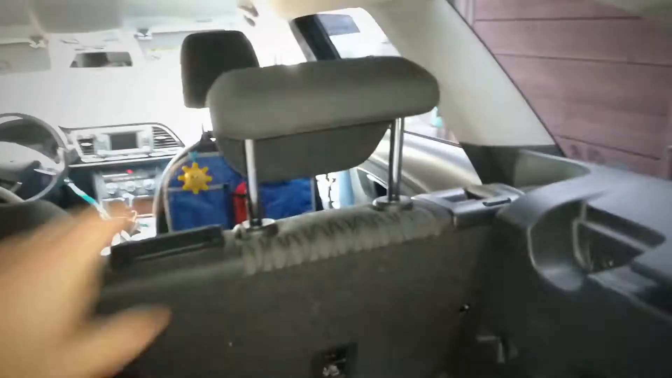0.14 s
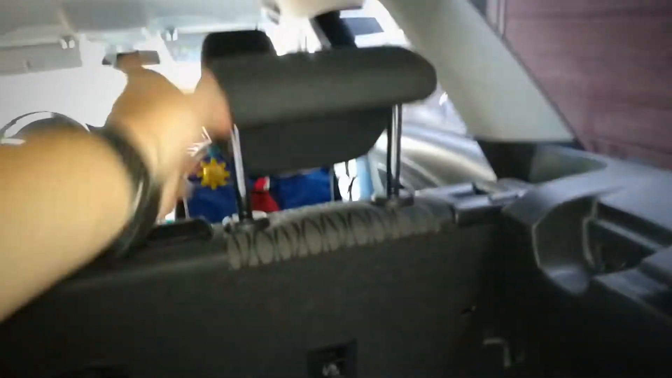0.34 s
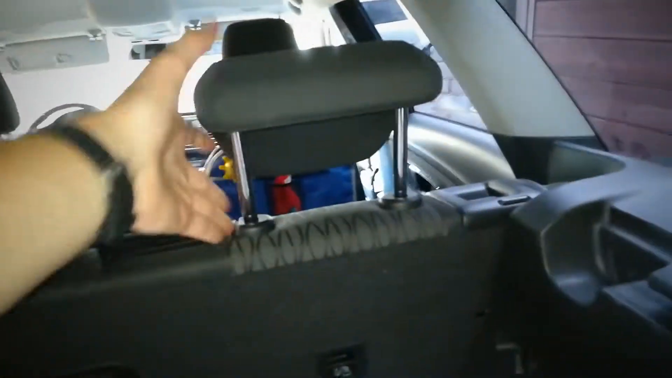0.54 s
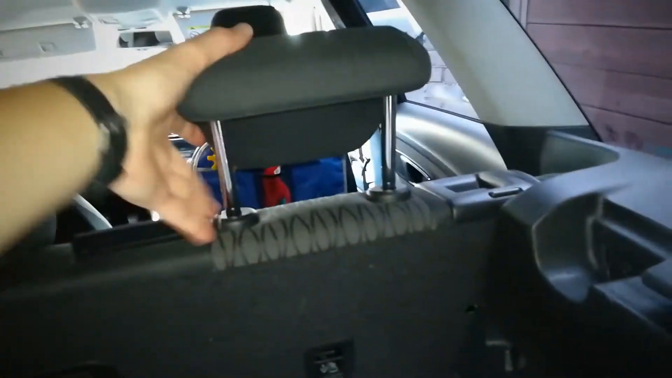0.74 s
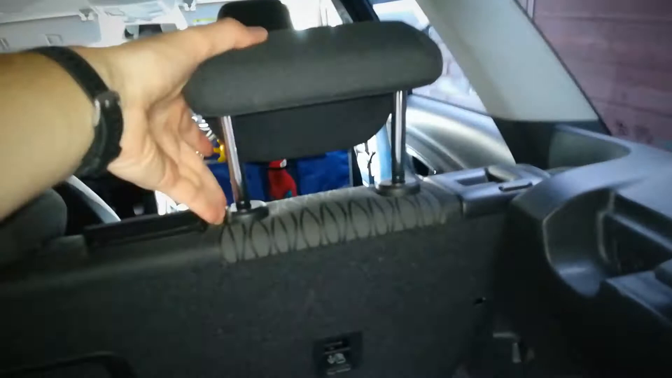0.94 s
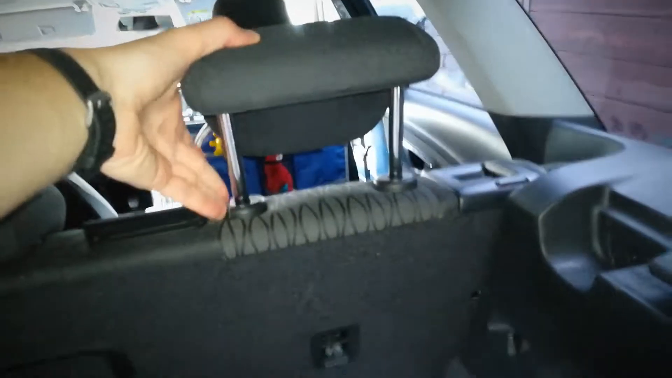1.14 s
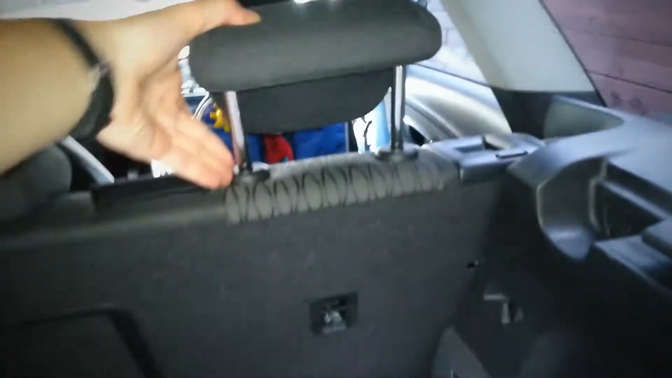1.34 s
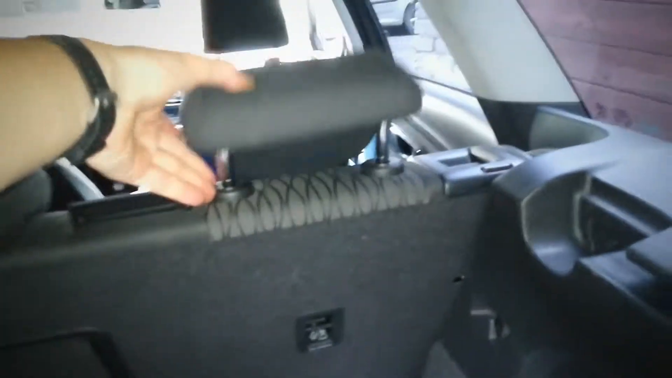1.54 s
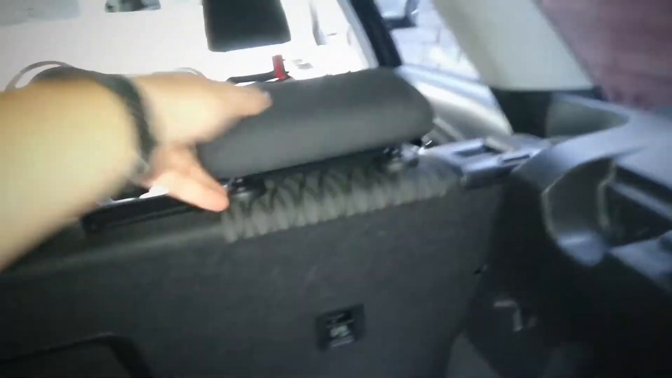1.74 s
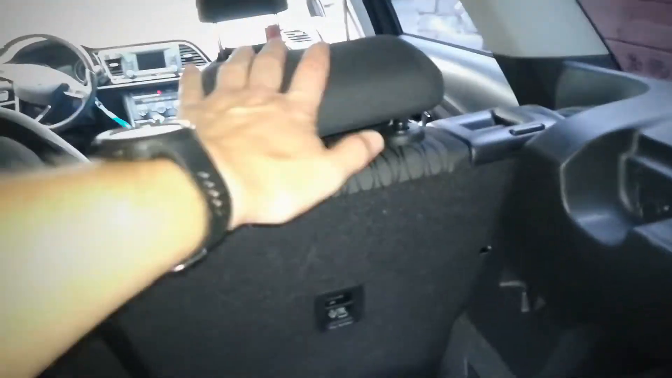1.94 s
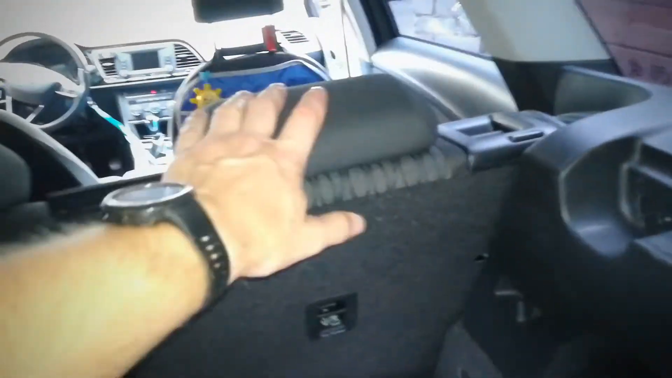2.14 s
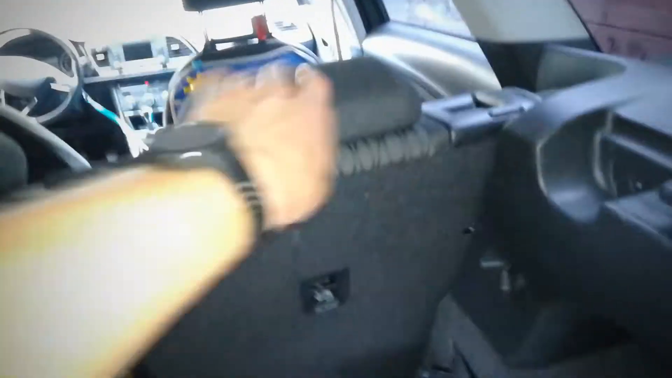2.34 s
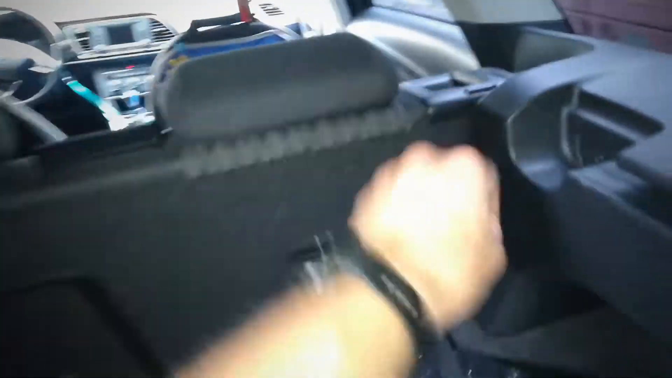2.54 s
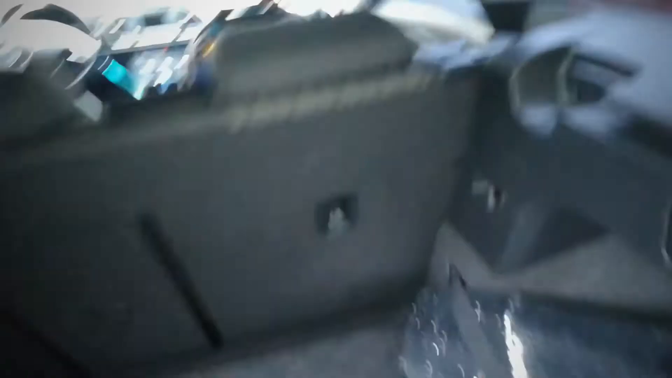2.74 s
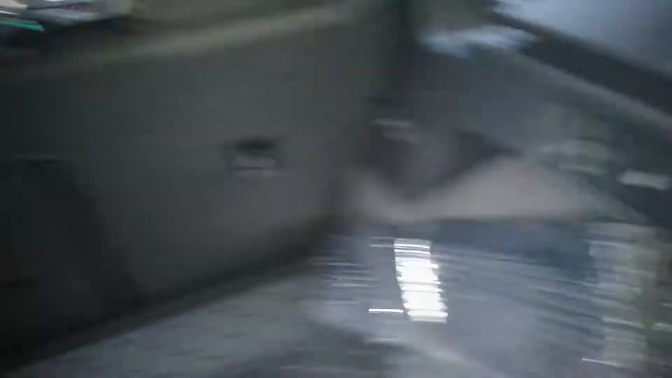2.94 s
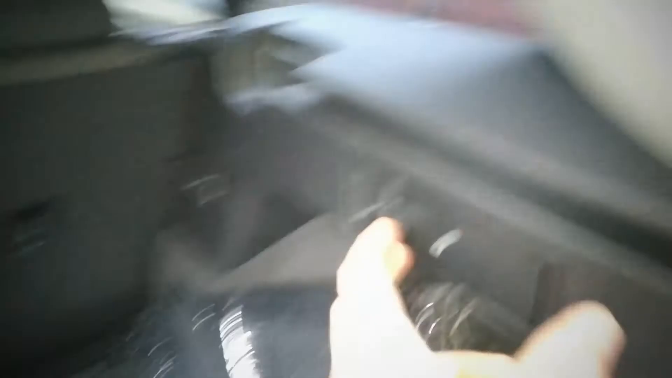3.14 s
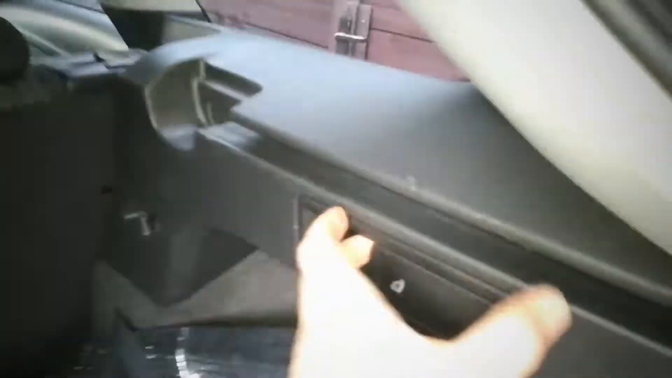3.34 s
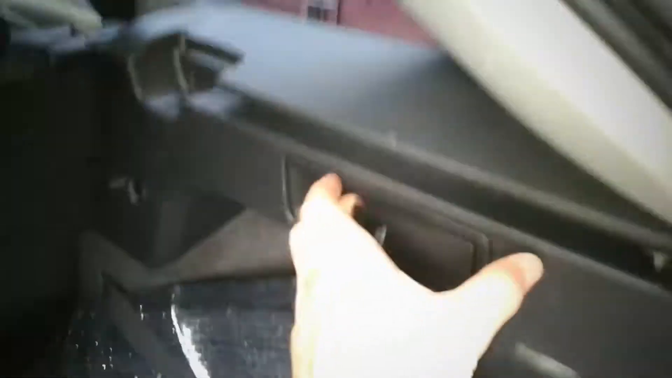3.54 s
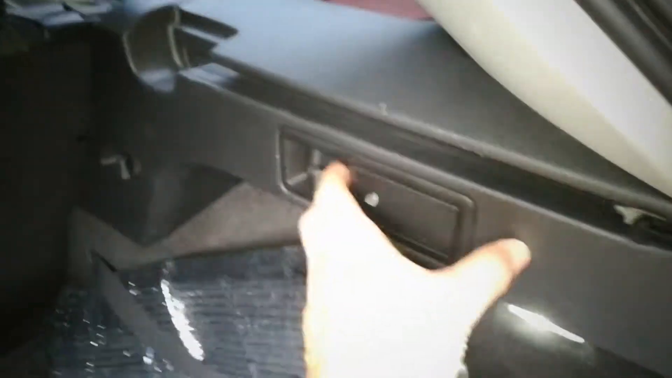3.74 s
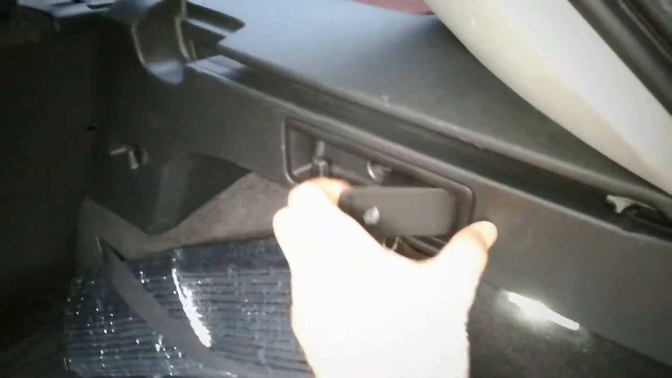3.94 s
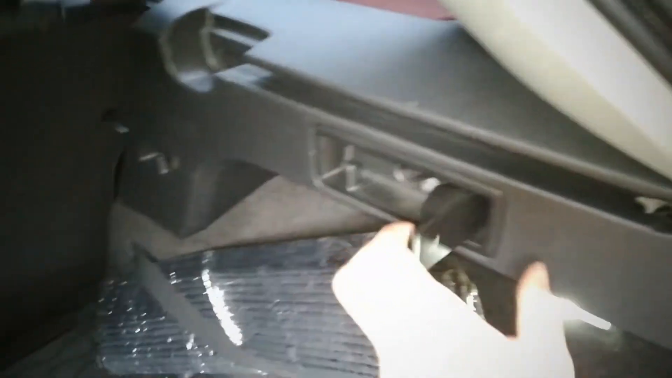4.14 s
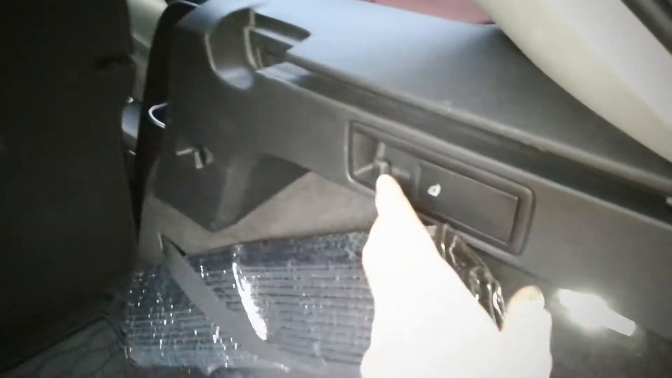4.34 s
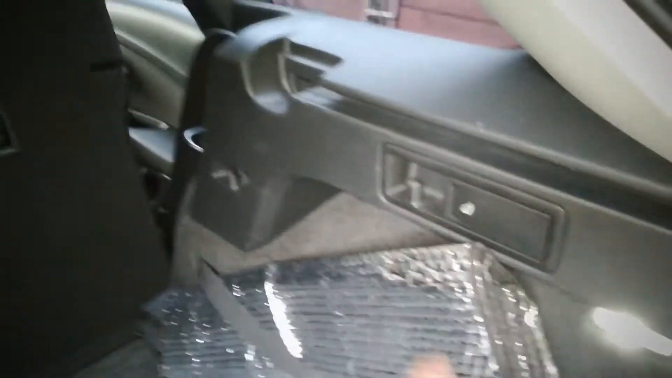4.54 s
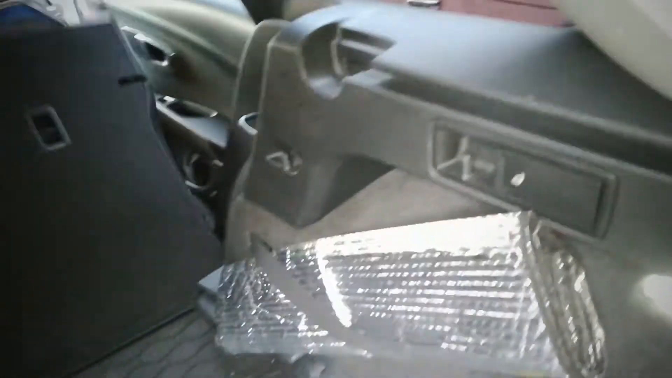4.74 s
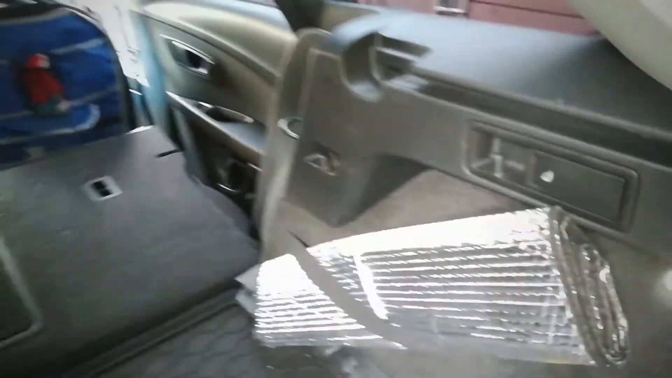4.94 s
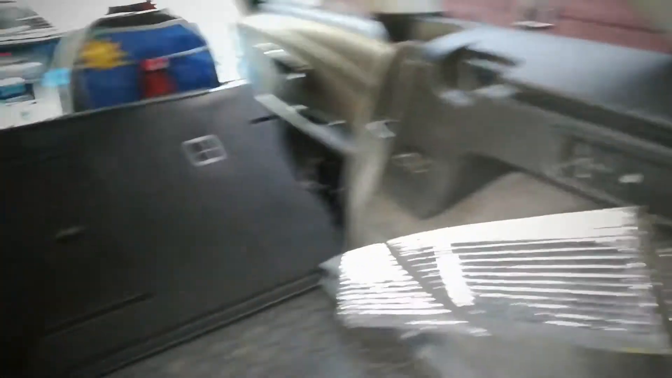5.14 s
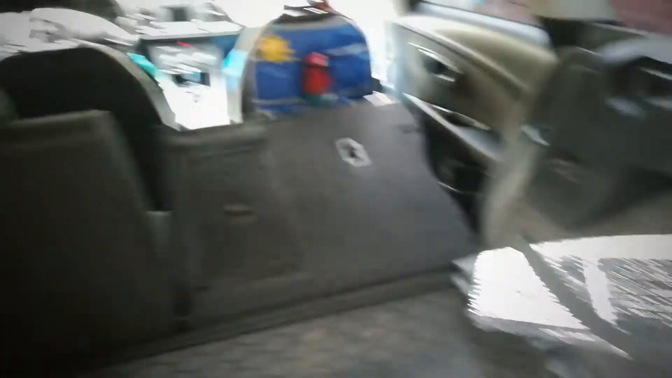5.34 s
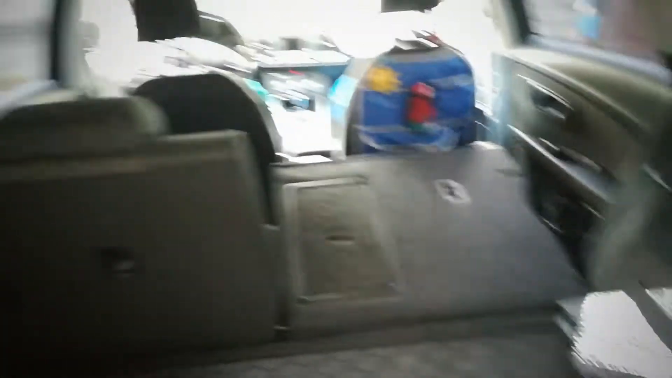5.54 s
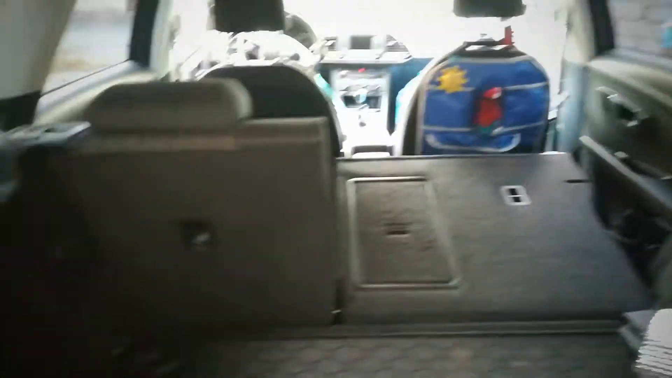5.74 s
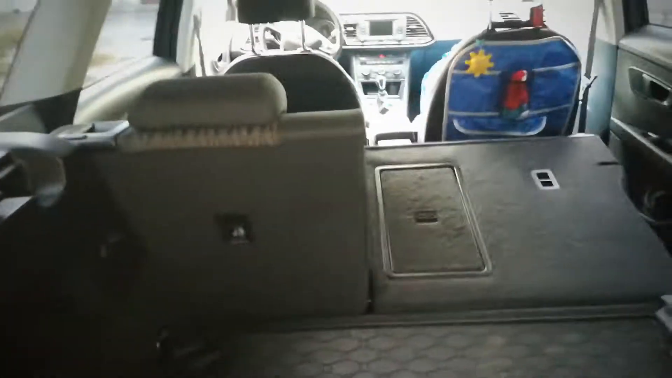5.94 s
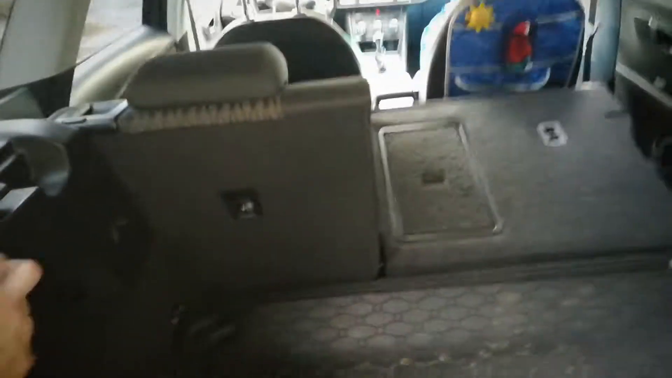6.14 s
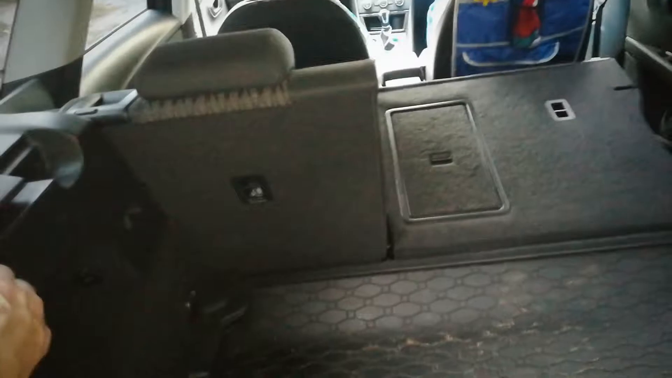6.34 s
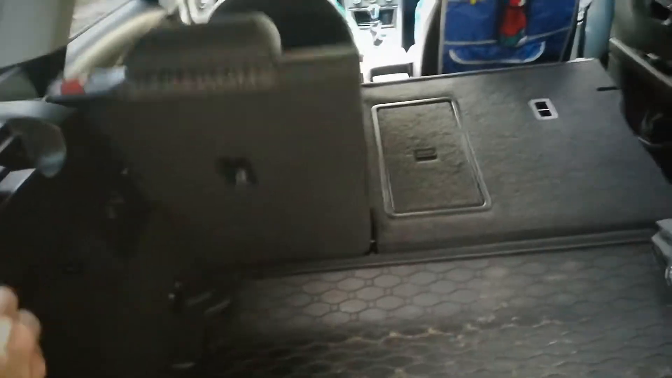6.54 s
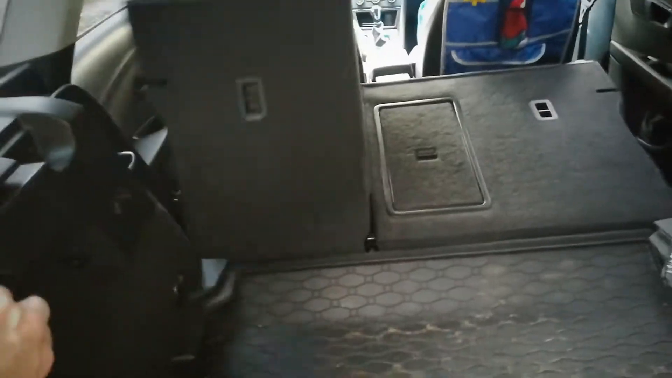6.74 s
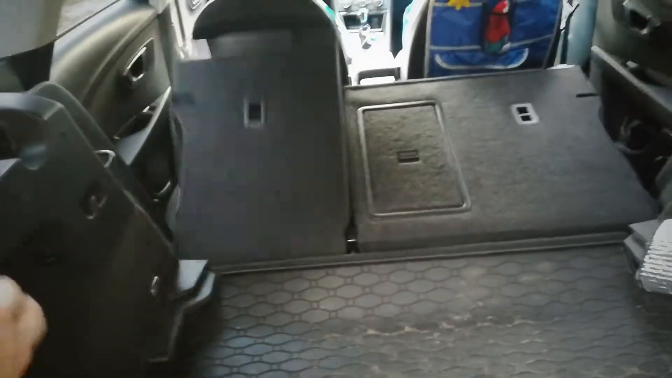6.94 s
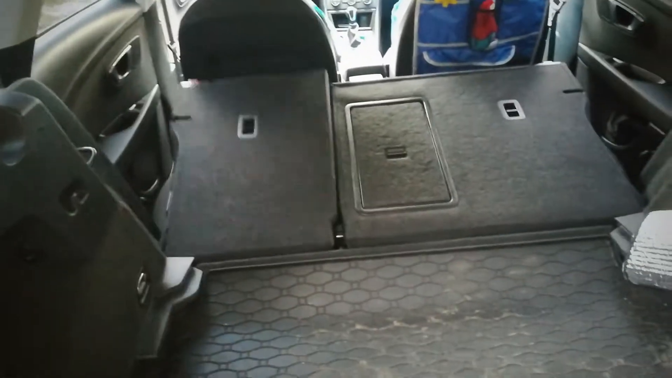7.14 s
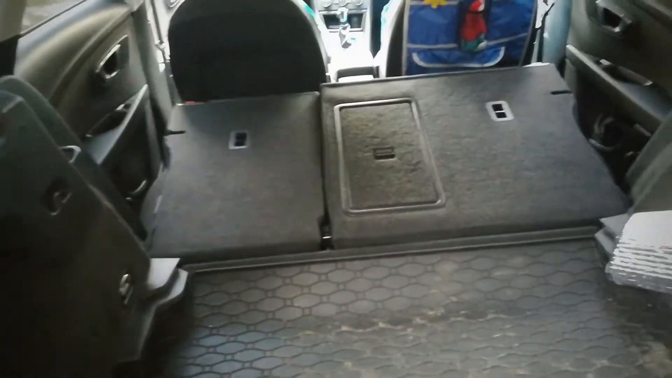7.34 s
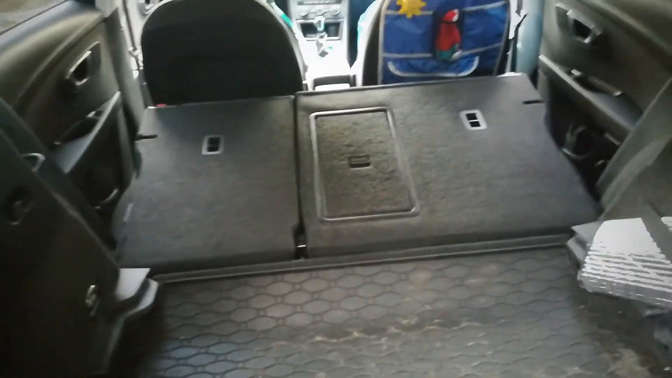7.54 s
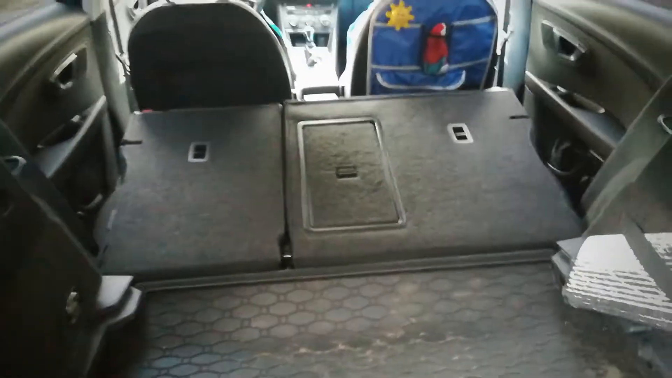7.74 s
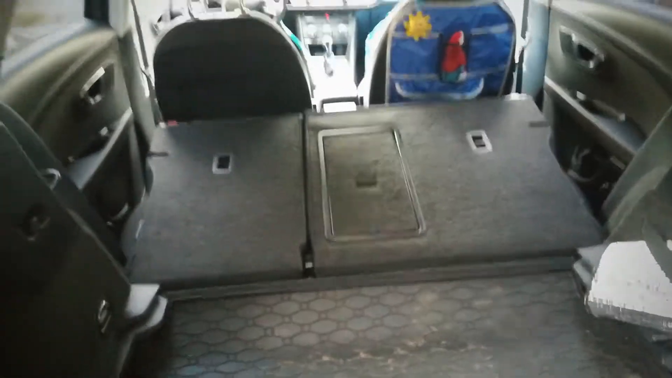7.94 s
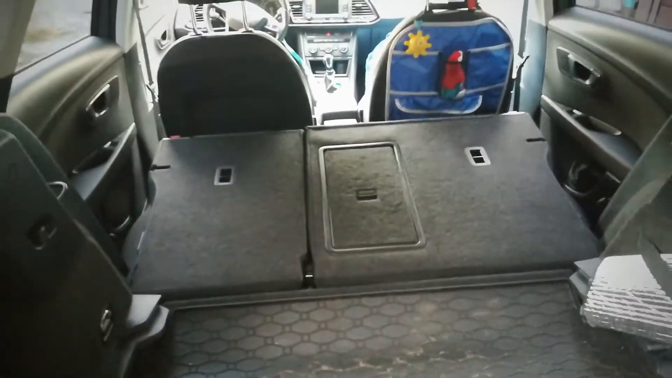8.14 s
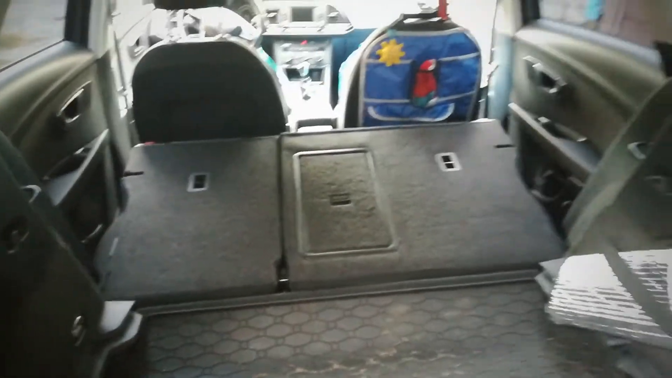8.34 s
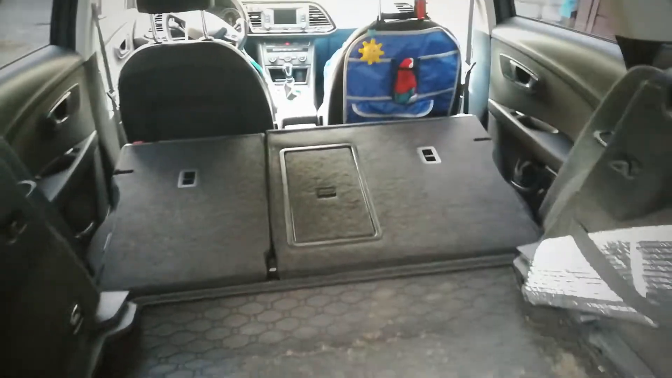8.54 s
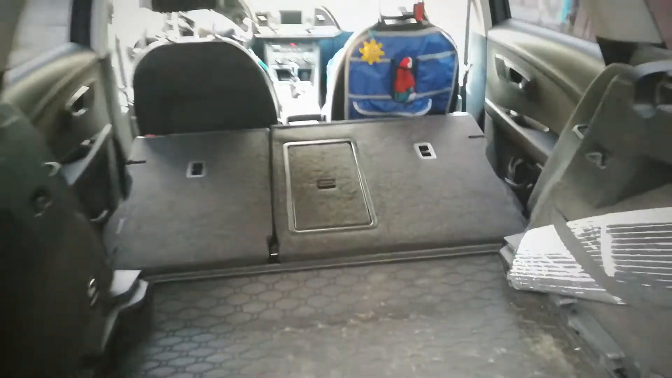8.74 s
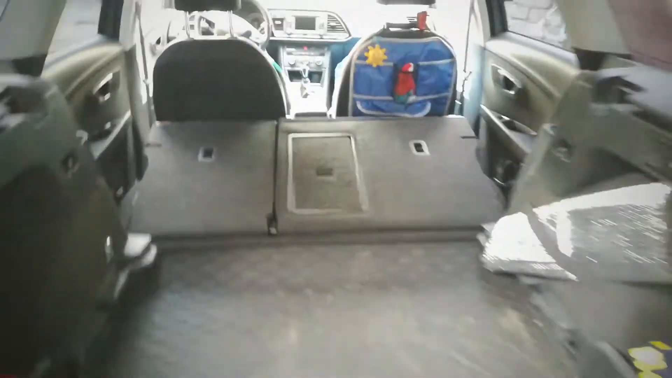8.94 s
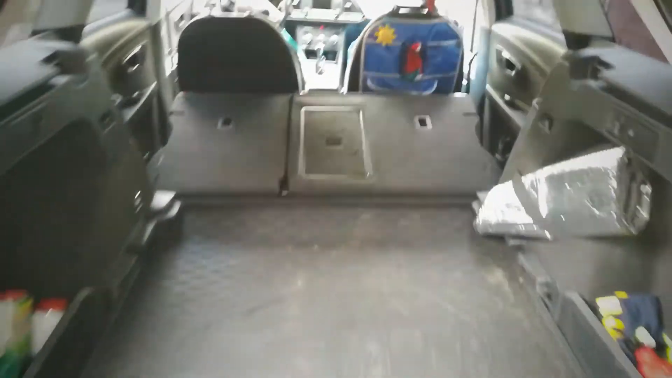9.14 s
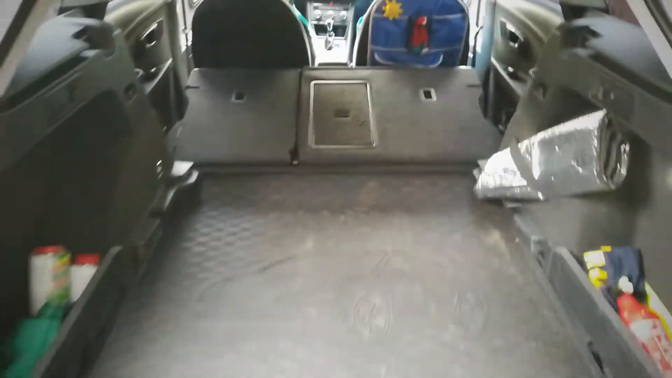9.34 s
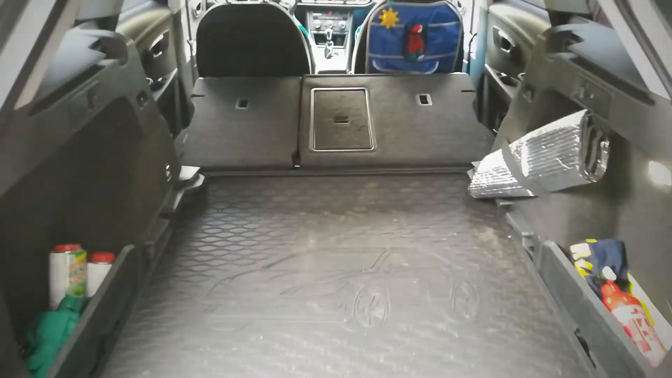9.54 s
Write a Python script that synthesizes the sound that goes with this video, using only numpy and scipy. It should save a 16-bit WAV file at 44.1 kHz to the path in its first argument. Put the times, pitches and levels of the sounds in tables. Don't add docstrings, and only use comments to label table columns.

```python
import sys
import numpy as np
from scipy import signal
from scipy.fft import rfft, irfft
from scipy.io import wavfile
from scipy.ndimage import uniform_filter1d

SR = 44100
rng = np.random.default_rng(int(sys.argv[2]) if len(sys.argv) > 2 else 0)


def log_audio(samples):
    frames = np.atleast_2d(samples).T
    limited = np.clip(frames, -1, 1)
    pcm = np.round(limited * 32767).astype(np.int16)
    wavfile.write(sys.argv[1], SR, pcm)


def nominal_scale(level):
    x = np.asarray(level, float) / 20
    return 10 ** x


N = 422478

# f/Hz, level/dB per Hz
AIR_SPECTRUM = [(15, -22.5), (25, 4), (87, -13.5), (145, -7), (217, -25), (575, -25.5), (14800, -37),
                (16000, -54.5)]
# t/s, f/Hz, level/dB
FAR_ENGINE = [(2.2, 145.3, -81), (2.85, 144.5, -74.5), (3.05, 146.4, -62), (3.25, 149.5, -61),
              (3.45, 142.6, -70)]
# t/s, f/Hz, level/dB
HEAVY_ENGINE = [(0, 60.1, -71), (.3, 60.55, -61.5), (.45, 61, -66)]
# t of most effort/s, level/dB, swell/s, settle/s, rub treble re level/dB
MOVES = [(0.4, -69, 0.33, 0.43, -1), (2.13, -68.5, 0.34, 0.36, -3.5), (3.41, -63.5, 0.45, 0.17, -10.5),
         (3.919, -65.5, 0.2, 0.39, -3.5), (4.09, -51, 0.078, 1.26, -13), (4.3, -58, 0.53, 0.16, -2.5),
         (4.42, -60, 0.1, 0.28, -7), (5.0, -71, .7, 1.8, -6.5), (6.6, -58, 0.23, 0.55, -7),
         (7.0, -46.5, 0.16, 0.16, -7), (7.4, -73.5, .1, 0.46, -7), (9.02, -79, .8, 2.4, -8)]
# t of most load/s, level/dB, swell/s, settle/s
SWAYS = [(0.43, -50, 0.16, 0.53), (2.03, -47, .13, 0.22), (2.29, -57.5, .5, .25), (3.409, -50.5, 0.43, .35),
         (4.101, -35, 0.13, .4), (4.189, -48.5, 0.6, .18), (4.601, -49.5, 1.2, 0.39),
         (5.07, -39.5, 0.22, .72), (6.72, -44, 0.44, 0.28), (7.15, -35.5, 0.17, .3),
         (7.35, -49.5, 0.33, 0.67), (9.28, -63.5, 1.12, 0.59)]
# start/s, end/s, level/dB, centre f/Hz
BRUSHES = [(1.82, 1.895, -70, 1510), (4.03, 4.062, -50.5, 3240), (4.393, 4.42, -50, 2020),
           (5.122, 5.159, -54, 1780), (5.72, 5.92, -68, 1710), (6.508, 6.535, -53, 4630),
           (6.635, 6.705, -57.5, 4840), (7.0, 7.085, -52.5, 5960), (7.16, 7.245, -66.5, 3520),
           (7.275, 7.36, -68.5, 3580), (6.33, 6.4, -68.5, 4940), (8.241, 8.279, -51.5, 2080)]
# start/s, end/s, level/dB, centre f/Hz
SWIPES = [
    (2.385, 2.495, -57.5, 4800),
    (2.06, 2.16, -70, 5500),
    (4.11, 4.36, -60, 8000),
    (8.19, 8.24, -64, 2000),
    (1.37, 1.46, -70, 370),
]
# start/s, end/s, level/dB, centre f/Hz
SLIDES = [(0.334, 0.426, -64, 2140), (2.875, 2.975, -73, 2060), (3.135, 3.213, -68.5, 930),
          (3.44, 3.533, -68.5, 1800), (4.098, 4.345, -53.5, 5700), (8.183, 8.211, -64.5, 4700),
          (8.785, 8.832, -69, 2186), (8.829, 8.933, -73, 2000), (6.355, 6.465, -61.5, 1320),
          (6.7, 6.88, -67, 1100), (6.925, 6.945, -46, 3300), (3.865, 3.96, -65, 1000),
          (1.26, 1.45, -72, 1660), (0.285, 0.33, -69, 950), (3.0, 3.035, -66, 960),
          (4.04, 4.065, -51.5, 3800)]
# start/s, end/s, level/dB, centre f/Hz
SQUEAKS = [(2.04, 2.16, -61, 1020), (2.408, 2.44, -61, 1460), (3.282, 3.45, -71, 1660),
           (5.327, 5.39, -58, 1420), (6.103, 6.187, -63.5, 1830), (6.11, 6.176, -63.5, 3600),
           (6.715, 6.86, -64, 1190), (6.873, 6.942, -51.5, 1160), (6.871, 6.927, -55, 3580),
           (7.275, 7.354, -63.5, 1220), (7.165, 7.245, -64, 1225)]
# start/s, end/s, level/dB, centre f/Hz
CHIRPS = [(3.248, 3.268, -58, 1790), (3.375, 3.405, -62, 1800), (3.489, 3.502, -50.5, 1820),
          (3.32, 3.35, -67, 4500), (4.755, 4.78, -73, 4700), (8.78, 8.81, -69, 2090),
          (8.785, 8.805, -70, 1480), (8.875, 8.93, -71.5, 1470), (9.055, 9.097, -73.5, 883),
          (2.311, 2.32, -62, 4580), (6.944, 6.96, -34, 3845)]
# t/s, snap/dB, snap f/Hz, edge re snap/dB, tick re snap/dB
GRIP = [(3.0, -35.5, 900, -15, -8), (3.124, -47, 790, -21, -15), (5.154, -48.5, 1360, -19.5, -18.5),
        (8.18, -49.5, 909.5, -18, -22), (8.191, -42, 895, -3, -5), (8.194, -50, 812, -3, -28),
        (8.2415, -32, 1014, -3.5, -12), (8.4345, -51, 1086, -3, 5.5)]
# t/s, snap/dB, snap f/Hz, edge re snap/dB, tick re snap/dB
TICKS = [(1.252, -35, 1120, 5, 5), (2.132, -45, 1160, -3, -9), (2.195, -48, 1500, 1, -15),
         (1.345, -46, 1100, -1, -5), (2.229, -41, 1230, 0, -19), (3.617, -32.5, 1720, -3, -12),
         (3.624, -30, 1140, -24, -25), (3.895, -46, 1430, -2, 2), (3.943, -41.5, 1390, -5, -18),
         (4.097, -30, 965, -11.5, -3.5), (6.767, -45.5, 1180, -10.5, -26), (8.79, -51, 2090, -10, -22),
         (8.836, -56, 2000, -5, -22), (8.961, -48, 2100, -8, -25), (9.047, -53, 2000, -4, -22),
         (4.3345, -30, 2200, 5, 1)]
# t/s, snap/dB, snap f/Hz, plastic edge re snap/dB, metal tick re snap/dB
HEADREST = [(0.324, -43.5, 1720, 6, -7.5), (0.438, -46.5, 1720, 5, -2), (0.466, -41.5, 1540, -0.5, -2.5),
            (0.83, -34, 1140, -6.5, -14), (1.239, -32.5, 1200, -24, -14), (1.727, -60.5, 1500, -5, -12),
            (1.863, -50.5, 1720, -6, 4), (1.95, -35.5, 820, -46, -39)]
# t/s, snap/dB, snap f/Hz, edge re snap/dB, tick re snap/dB
RIGHT_LEVER = [(3.255, -53, 1748, -10, -10), (3.28, -36, 1850, -3, -16), (3.33, -46, 1260, -3, -16),
               (3.492, -41.5, 1620, -34, -14), (3.613, -31, 1830, -21, -8.5), (3.866, -49.5, 1700, -17, -7),
               (3.927, -39, 2200, -14, -28), (4.031, -29, 2060, -9, -14), (4.046, -41, 1430, 5, -14),
               (4.083, -20.5, 990, -18, -24), (4.385, -29, 1010, 2.5, -2.5), (4.475, -40, 953, -19, -16),
               (4.948, -42.5, 1010, -4, -11), (4.966, -49.5, 1600, 12, 4), (5.004, -47, 1130, 1.5, 8),
               (5.131, -35.5, 1810, -0.5, -6)]
# t/s, snap/dB, snap f/Hz, edge re snap/dB, tick re snap/dB
LEFT_LEVER = [(6.223, -39, 1970, -20, -21.5), (6.356, -41, 1300, -9.5, -5.5), (6.512, -36, 1380, -2, -13),
              (6.57, -26, 1100, -20, -26), (6.585, -40, 1590, 7, -6), (6.607, -30, 1600, 6, -10),
              (6.613, -23, 1420, -16, -14), (6.632, -31, 1180, 7, -7), (6.978, -30.5, 1830, 6.5, -8),
              (7.08, -34, 1110, -14.5, -29)]
# t/s, snap/dB, snap f/Hz, edge re snap/dB, tick re snap/dB
SLAMS = [
    (4.3522, -30, 1570, 3, 3),
    (4.3562, -13, 1500, 0, -4),
    (6.9445, -16, 1600, 1, -7),
    (6.9475, -22, 1600, 5, 0),
    (6.951, -19, 1740, -2, -7),
]
# f/Hz, level/0.2 dB, decay time constant/2.5 ms
LATCH_MODES = [(770, -30, 0.11), (1083, -24.5, 0.089), (1450, -8, 0.13), (1740, -12.5, 0.74),
               (2280, -22, 0.48), (3130, -19.5, 0.28), (3500, 13, 0.091), (3943, 5.5, 1),
               (4710, 24.5, 0.38), (5200, -19, 0.21), (6840, -4, 0.17), (7800, -4.5, 0.45),
               (8930, -0.5, 0.4)]
# t/s, level/dB, main mode f/Hz, t60/s
KNOCKS = [(0.456, -39.5, 174.5, 0.12), (0.83, -34, 280, 0.057), (1.239, -39.5, 173, 0.13),
          (1.863, -49.5, 347, 0.024), (1.947, -50.5, 165, 0.15), (2.134, -43.5, 163, 0.053),
          (3.279, -44.5, 159.5, 0.17), (3.49, -47.5, 166, 0.15), (3.614, -37, 159, 0.12),
          (4.029, -43, 154, 0.095), (4.08, -30.5, 187, 0.088), (4.357, -25, 164, 0.18),
          (4.386, -31, 165.5, 0.15), (4.946, -35, 142, 0.06), (5.126, -57, 131, 0.27),
          (5.51, -46.5, 144, 0.15), (5.951, -59.5, 132, 0.041), (6.354, -50.5, 155.6, 0.22),
          (6.565, -33, 139.4, 0.14), (6.607, -35, 118, 0.14), (6.946, -31.5, 150, 0.15),
          (7.079, -26, 124, 0.18), (7.355, -43.5, 129, 0.089), (8.190, -34.5, 127.5, 0.034),
          (9.185, -63, 176.3, 0.072)]
# t/s, level/dB, main mode f/Hz, t60/s
NUDGES = [(6.22, -48.5, 110, 0.24), (5.6, -48, 122.6, 0.38), (6.57, -28.5, 137, 0.15), (6.7, -46.5, 94, .5),
          (6.99, -31, 220, 0.13), (6.952, -26, 185, .2), (8.2415, -43.5, 320, 0.033), (3.0, -51, 350, .04),
          (4.385, -31, 370, .1), (4.358, -31, 380, 0.065), (0.83, -44, 108, 0.22), (3.9, -48, 70, .15)]
# t/s, level/dB, main mode f/Hz, t60/s
THUDS = [(0.44, -47.5, 133, 0.23), (0.82, -40.5, 128, 0.29), (1.252, -34, 69.6, 0.35),
         (1.942, -51.5, 122, 0.48), (2.123, -38, 42.4, 0.56), (3.355, -44.5, 88.7, 0.58),
         (4.074, -31, 127, 0.25), (4.159, -35, 79.5, 0.17), (4.984, -25, 77.8, 0.38),
         (5.041, -27.5, 46, 0.15), (5.261, -35, 39.1, 0.14), (5.396, -36.5, 73.4, 0.65),
         (5.518, -33, 54, 0.4), (5.935, -50, 106.7, 0.42), (6.561, -44.5, 124, 0.86),
         (6.649, -31.5, 63.4, 0.16), (6.943, -37.5, 87.6, 0.52), (7.119, -27, 48.4, 0.25),
         (7.356, -29.5, 46.7, 0.33), (8.168, -54, 95.5, 0.24), (9.174, -37.5, 69.5, 0.28),
         (9.288, -43, 42.1, 0.35)]
# t/s, level/dB, main mode f/Hz, t60/s
LANDINGS = [
    (4.958, -14, 93.7, 0.12),
    (7.089, -14, 80, 0.18),
    (6.955, -24, 140, 0.068),
    (5.268, -31, 55, 0.085),
    (2.141, -38, 59, 0.27),
]
# f/Hz, left re right/dB
CASING_TILT = [(300, -0.5), (700, 3), (1290, -4.5), (2380, 1.5), (4400, 2.5), (8100, -4), (15000, -7)]

AIR_DB = -69.5
REST_DB, SHELL_REST_DB = -86, -74
CREAK_DB, CREAK_PER_DB = 6, 1.0269
BRUSH_OCTAVES, SWIPE_OCTAVES, SLIDE_OCTAVES, SQUEAK_OCTAVES, CHIRP_OCTAVES = 1.3, 0.8, 0.7, 0.25, 0.063
BRUSH_SAG_DB, SWIPE_SAG_DB, SLIDE_SAG_DB, SQUEAK_SAG_DB, CHIRP_SAG_DB = -5.5, 0, 1.5, -1, 2
PATCHY_DB = 1.8
HEADREST_PAN_DB, RIGHT_PAN_DB, LEFT_PAN_DB = -1.5, -3, 1
TICK_PAN_DB, GRIP_PAN_DB, SLAM_PAN_DB = -1.5, 15, -0.5
PORT_LAG_SAMPLES, PORT_LAG_SAMPLES_PER_DB = 8.5, 1.5
CABIN_T60_S, CABIN_DB = 0.17, -17


def band(x, lo_hz, hi_hz, order=2):
    sos = signal.butter(order, [lo_hz, min(hi_hz, 0.45 * SR)], "bandpass", fs=SR, output="sos")
    return signal.sosfilt(sos, x)


def unit(x):
    return x / np.sqrt(np.mean(x ** 2))


def peak(x, db):
    return x * nominal_scale(db) / np.max(np.abs(x))


def fade(t, t60_s):
    return np.exp(-np.log(1000) * t / max(t60_s, 0.004))


def add(out, start_s, x, pan_db=0.0, lag=0):
    for ch, side in enumerate((1, -1)):
        i = int(start_s * SR) + max(-side * lag, 0)
        part = x[ch % len(x)][:N - i]
        out[ch, i:i + len(part)] += nominal_scale(side * pan_db / 2) * part


def walk(rate_hz):
    hold = int(SR / rate_hz)
    steps = np.repeat(rng.standard_normal(N // hold + 1), hold)
    return 1.4 * uniform_filter1d(uniform_filter1d(steps, hold), hold)[:N]


def ports(lo_hz, hi_hz, apart, size=N):
    mid, side = unit(band(rng.standard_normal((2, size)), lo_hz, hi_hz))
    return np.array([mid + apart * side, mid - apart * side]) / np.sqrt(1 + apart ** 2)


def effort(peak_s, db, swell_s, settle_s):
    t = np.arange(0, N, 64) / SR
    late = t - np.asarray(peak_s)[:, None]
    distance = np.where(late < 0, -late / swell_s[:, None], late / settle_s[:, None])
    shape = nominal_scale(db[:, None] - 20 * distance)
    return np.repeat(np.sqrt(np.sum(shape ** 2, axis=0)), 64)[:N]


def air():
    f = np.maximum(np.fft.rfftfreq(N, 1 / SR), 1)
    hz, db = np.transpose(AIR_SPECTRUM)
    colour = nominal_scale(np.interp(np.log(f), np.log(hz), db))
    mid, side = rfft(rng.standard_normal((2, N))) * colour
    side *= np.clip(f / 220, 0.05, 1)
    return nominal_scale(AIR_DB) * unit(irfft(np.array([mid + side, mid - side]), N))


def engine(table):
    s, hz, db = np.transpose(table)
    t = np.arange(N) / SR
    wavering_hz = np.interp(t, s, hz) * (1 + 0.012 * walk(20))
    phase = 2 * np.pi * np.cumsum(wavering_hz) / SR
    level = nominal_scale(np.interp(t, s, db, -120, -120) + 1.724 * walk(11))
    return np.sqrt(2) * level * np.sin(phase)


def motion():
    s, db, swell_s, settle_s, treble_db = np.transpose(MOVES)
    work = effort(s, db, swell_s, settle_s) + nominal_scale(REST_DB)
    sheen = effort(s, db + treble_db, swell_s, settle_s) + nominal_scale(REST_DB)
    strain = nominal_scale(-71 + CREAK_DB) * (work / nominal_scale(-68.5)) ** CREAK_PER_DB
    load = effort(*np.transpose(SWAYS)) + nominal_scale(SHELL_REST_DB)
    grain_db = 1.5 * walk(150)
    rub = work * nominal_scale(grain_db + 1) * (ports(730, 1900, 0.92) + 0.44 * ports(1700, 4500, 0.52))
    fuzz = sheen * nominal_scale(grain_db - 1) * (ports(3400, 9200, 1) + 0.1 * ports(5800, 20000, 0.9))
    creak = strain * nominal_scale(3 * walk(22) - 3.5) * (ports(110, 221, 0.14) + 0.58 * ports(260, 450, 0.96))
    shell = load * nominal_scale(1.2 * walk(14) - 7.5) * (ports(32, 60, 0.05) + 0.9 * ports(60, 100, 0.076))
    return rub + fuzz + creak + shell


def scrapes(table, octaves, sag_db, taper=0.4):
    out = np.zeros((2, N))
    for start_s, end_s, db, hz in table:
        count = int((end_s - start_s) * SR)
        n = np.arange(count)
        grit = nominal_scale(2.6 * np.repeat(rng.standard_normal(count // 64 + 1), 64)[:count])
        grit *= nominal_scale(PATCHY_DB * np.interp(n / 600, np.arange(50), rng.standard_normal(50)))
        level = nominal_scale(db + sag_db * (n / count - 0.5)) * signal.windows.tukey(count, taper)
        noise = ports(hz / 2 ** octaves, hz * 2 ** octaves, 0.57, size=count)
        add(out, start_s, level * grit * noise)
    return out


def clicks(table, t60_s, pan_db, touch=9.7, crack=13.0):
    out, t = np.zeros((2, N)), np.arange(3500) / SR
    short_t = t[:400]
    hz, mode_db, ring_s = np.transpose(LATCH_MODES)[:, :, None]
    side = np.array([1, -1])[:, None, None]
    lag = int(PORT_LAG_SAMPLES + PORT_LAG_SAMPLES_PER_DB * pan_db)
    for s, db, snap_hz, edge_db, tick_db in table:
        shared, own = rng.standard_normal(len(t)), rng.standard_normal((2, len(t)))
        impacts = (shared + 0.85 * own) * nominal_scale(2.8 * rng.exponential(size=len(t)))
        impacts *= fade(t, 0.18 * t60_s) + 0.31 * fade(t, t60_s)
        impacts *= 1 - np.exp(-t / 0.00045)
        impacts[:, 14] += touch
        detune, spread, angle = rng.standard_normal((3, len(hz), 1))
        swing = np.sin(2 * np.pi * hz * (1 + 0.06 * detune) * short_t + 0.92 * side * angle)
        decay = np.exp(-short_t / (0.0025 * ring_s))
        modes = np.sum(nominal_scale(0.2 * mode_db + 2 * spread) * decay * swing, axis=1)
        modes[:, 0] += crack
        views = signal.fftconvolve(impacts, modes, axes=1)[:, :len(t)]
        snap = peak(band(views, snap_hz / 1.6, snap_hz * 1.45), db + 2)
        edge = peak(band(views, 2300, 5600), db + edge_db + 3)
        tick = peak(band(views * fade(t, 1.5 * t60_s), 5600, 10800), db + tick_db + 3)
        add(out, s, snap - edge + tick, pan_db, lag)
    return out


def blows(table, mode_set, push_cycles, rattle, gain_db):
    out, t = np.zeros((2, N)), np.arange(11000) / SR
    for s, db, hz, t60_s in table:
        force = rng.standard_normal(len(t)) * fade(t, t60_s) * rattle * np.sqrt(hz / SR)
        force[0] -= 1
        force = np.convolve(force, np.hanning(int(push_cycles * SR / hz) + 3))
        skew = rng.choice([-1, 1]) * np.array([[1], [-1]])
        modes = np.zeros((2, len(t)))
        for ratio, mode_db, share in mode_set:
            phase = 2 * np.pi * ratio * hz * t + skew * min(ratio * hz / 700, 0.9)
            modes += nominal_scale(mode_db) * fade(t, share * t60_s) * np.sin(phase)
        ringing = signal.fftconvolve(force[None], modes, axes=1)[:, :len(t)]
        add(out, s, peak(ringing, db + gain_db))
    return out


def cabin(x):
    t = np.arange(int(0.4 * SR)) / SR
    tail = fade(t, CABIN_T60_S) * ports(400, 2700, 0.24, size=len(t))
    tail += 0.2 * fade(t, 0.6 * CABIN_T60_S) * ports(3000, 8900, 0.76, size=len(t))
    tail *= (t > 0.002) * nominal_scale(CABIN_DB) / np.sqrt(np.sum(tail ** 2) / 2)
    return x + signal.fftconvolve(x.mean(axis=0)[None], tail)[:, :N]


def casing(x):
    hz, tilt_db = np.transpose(CASING_TILT)
    tilt = np.interp(np.log(np.fft.rfftfreq(N, 1 / SR) + 1), np.log(hz), tilt_db)
    return irfft(rfft(x) * nominal_scale(np.array([tilt, -tilt]) / 2), N)


def scene():
    outside = air() + engine(FAR_ENGINE) + engine(HEAVY_ENGINE)
    rubs = scrapes(BRUSHES, BRUSH_OCTAVES, BRUSH_SAG_DB)
    rubs += scrapes(SWIPES, SWIPE_OCTAVES, SWIPE_SAG_DB, taper=0.9)
    rubs += scrapes(SLIDES, SLIDE_OCTAVES, SLIDE_SAG_DB)
    rubs += scrapes(SQUEAKS, SQUEAK_OCTAVES, SQUEAK_SAG_DB)
    rubs += scrapes(CHIRPS, CHIRP_OCTAVES, CHIRP_SAG_DB)
    grip = clicks(GRIP, 0.013, GRIP_PAN_DB, touch=23.0, crack=26.0)
    hits = clicks(TICKS, 0.021, TICK_PAN_DB)
    hits += clicks(HEADREST, 0.13, HEADREST_PAN_DB)
    hits += clicks(RIGHT_LEVER, 0.13, RIGHT_PAN_DB)
    hits += clicks(LEFT_LEVER, 0.13, LEFT_PAN_DB)
    hits += clicks(SLAMS, 0.06, SLAM_PAN_DB)
    knock_modes = [(1, 0.5, 0.75), (1.47, -4.5, 0.59), (2.25, -5, 0.27), (3.4, -17.5, 0.3)]
    nudge_modes = [(1.02, 1.5, 0.687), (1.4, -5, 0.4), (0.7, -7.5, 0.24)]
    thud_modes = [(1.1, 0, 0.62), (0.38, -4.5, 0.23), (1.8, -5.5, 0.35)]
    landing_modes = [(1.09, 10, 0.32), (0.39, -14.5, 0.71), (1.7, -2.5, 0.87)]
    knocks = blows(KNOCKS, knock_modes, push_cycles=0.089, rattle=1.1, gain_db=3.5)
    nudges = blows(NUDGES, nudge_modes, push_cycles=0.2, rattle=0.76, gain_db=0.5)
    thuds = blows(THUDS, thud_modes, push_cycles=0.27, rattle=1.4, gain_db=0.25)
    landings = blows(LANDINGS, landing_modes, push_cycles=0.33, rattle=0.73, gain_db=0.1)
    shaded = casing(cabin(hits + knocks) + rubs + motion())
    return outside + shaded + grip + nudges + thuds + landings


def low_pass(x):
    return signal.sosfilt(signal.butter(12, 16470, fs=SR, output="sos"), x)


def record(dry):
    mix = signal.sosfilt(signal.butter(10, 15700, fs=SR, output="sos"), dry)
    return low_pass(mix)


dry = scene()
out = record(dry)
log_audio(out)
```